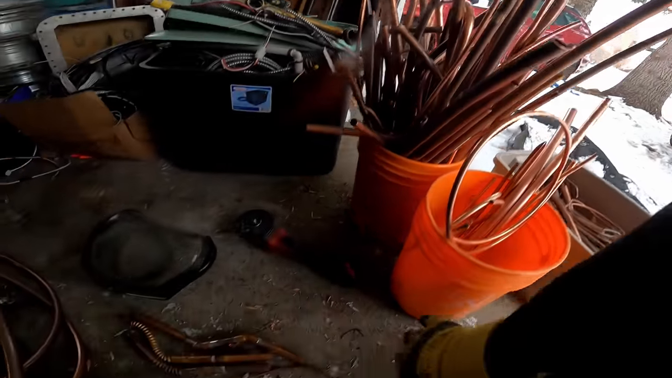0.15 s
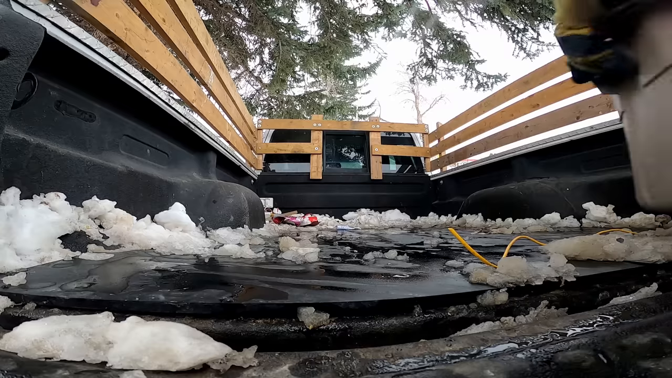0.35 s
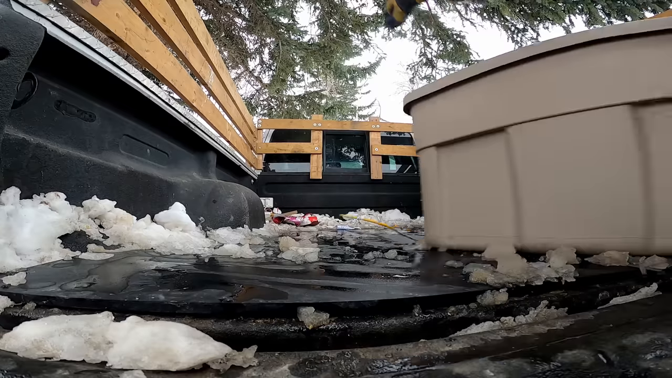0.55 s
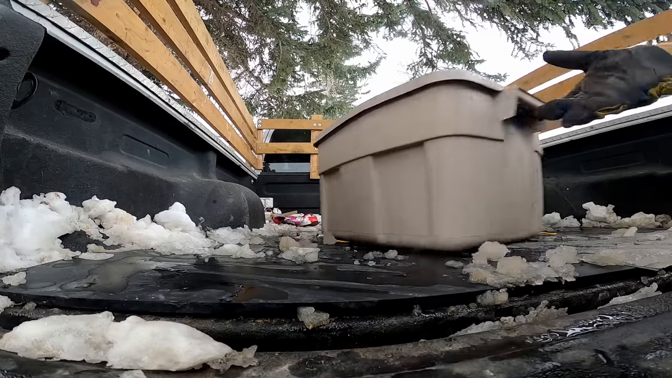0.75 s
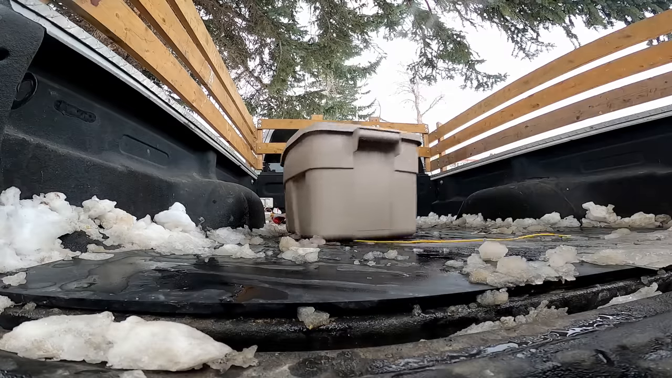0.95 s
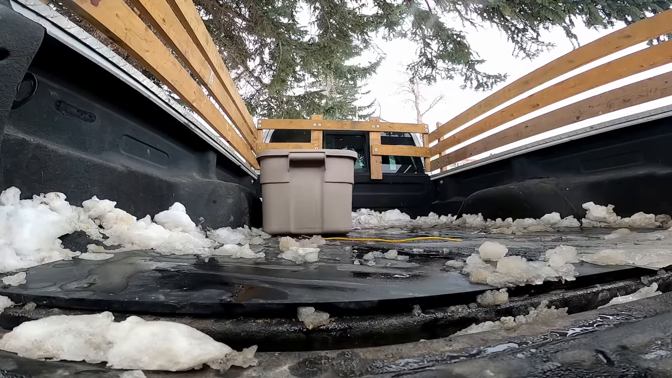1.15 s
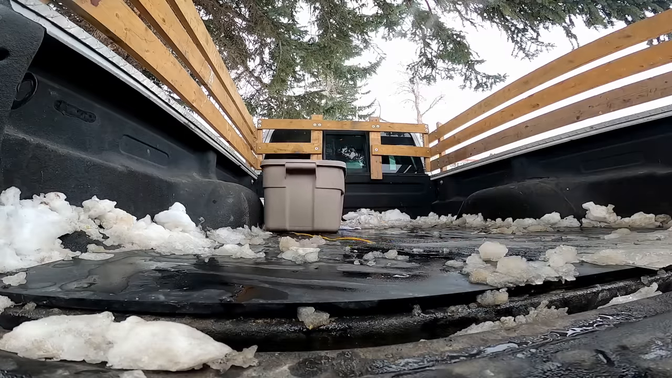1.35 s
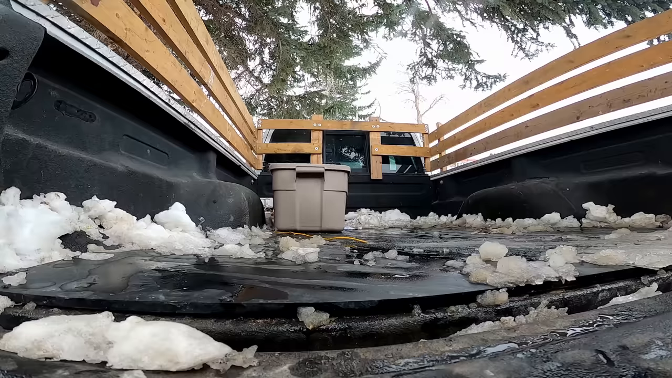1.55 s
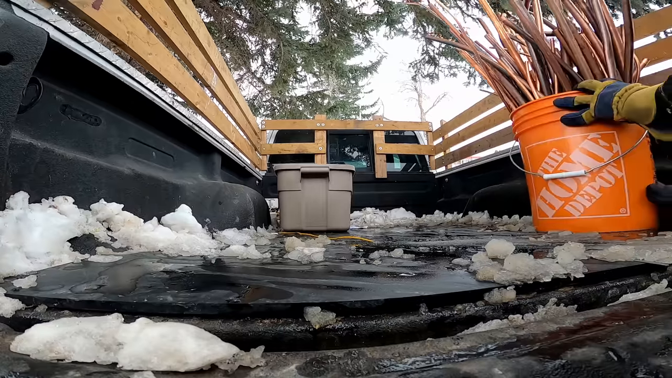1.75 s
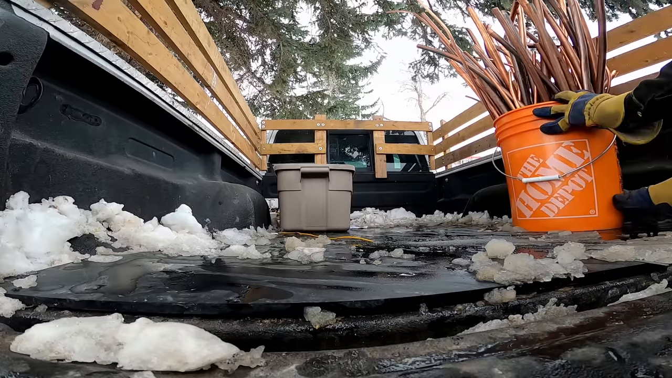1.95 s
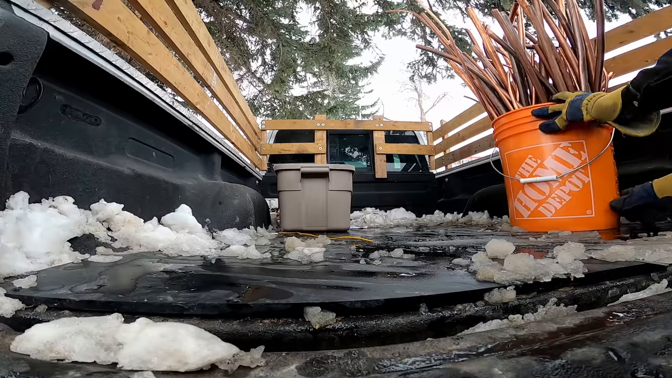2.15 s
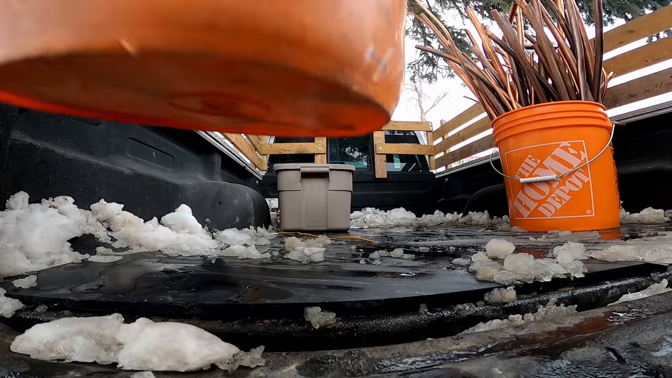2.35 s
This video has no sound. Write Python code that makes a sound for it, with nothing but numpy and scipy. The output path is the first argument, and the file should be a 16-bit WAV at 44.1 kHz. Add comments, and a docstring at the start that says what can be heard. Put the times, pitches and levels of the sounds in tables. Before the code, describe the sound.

A loaded plastic tote is shoved along an icy truck bed close to the microphone, crunching, knocking and rattling, then a bucket of copper tubing lands with a clatter, shifts slightly, and a few tubes clink outdoors.

```python
"""Close to the microphone, a loaded plastic tote is shoved along an icy truck bed: it crunches, drums and stops.
Its friction is random grain impulses ringing the tote and its scrap; knocks, snaps and thuds are struck on top.
Then a bucket of copper tubing lands with a clatter of ringing modes and is nudged into place.
As that ends, loose tubes clink on and the microphone takes a soft bump, one pressure pulse.
Throughout, filtered noise makes the rumble of the bed on its springs and the quiet outdoor air."""
import sys
import numpy as np
from scipy import signal
from scipy.fft import rfft, irfft
from scipy.io import wavfile
from scipy.ndimage import uniform_filter1d

SR = 44100
rng = np.random.default_rng(int(sys.argv[2]) if len(sys.argv) > 2 else 0)


def file_out(sig):
    """Save sig as 16-bit WAV at sys.argv[1]."""
    # one column per channel
    cols = np.atleast_2d(sig).T
    # limit, then scale
    lim = np.clip(cols, -1, 1)
    pcm = np.round(lim * 32767).astype(np.int16)
    wavfile.write(sys.argv[1], SR, pcm)


N = 110250

# Friction of tote and bucket on the bed: start_s, drumming_db, scrape_db, crunch_db, fizz_db
TOTE_FRICTION = [(0.031, -68, -72, -73, -82), (.15, -61.5, -59, -62.5, -72.5), (.295, -61, -78, -64.5, -63),
                 (.315, -45.5, -54, -59, -81), (.37, -44, -49.5, -57, -71), (.425, -51, -56, -58, -68),
                 (.478, -39.5, -55, -61, -75), (.495, -49, -48, -43, -62), (.518, -41, -37, -45, -49),
                 (0.537, -31.5, -26.5, -28.5, -41), (.556, -24.5, -32.5, -30, -39.5),
                 (.635, -26.5, -36, -26, -40), (.685, -30, -30.5, -25.5, -38.5), (.73, -36, -38, -30, -47),
                 (.775, -30, -28, -31, -40.5), (.85, -30.5, -31, -34.5, -41),
                 (.925, -31.5, -31.5, -26.5, -34.5), (.955, -31.5, -35.5, -30, -38.5),
                 (1.019, -36.5, -27.5, -32.5, -36), (1.05, -41.5, -31.5, -34.5, -43),
                 (1.14, -34.5, -34, -33, -47), (1.235, -39.5, -33.5, -30.5, -44),
                 (1.275, -26, -28, -35.5, -46), (1.37, -29.5, -36, -34.5, -45.5),
                 (1.45, -33, -39, -42, -50.5), (1.62, -40, -44.5, -48.5, -63.5)]
BUCKET_FRICTION = [(1.632, -41, -46, -31.5, -54), (1.67, -43, -44, -40, -47), (1.737, -42, -50.5, -45, -69),
                   (1.755, -44.5, -44, -52.5, -56), (1.84, -43.5, -44, -42, -61),
                   (1.88, -47, -44, -49.5, -62), (1.94, -47, -46.5, -48, -59),
                   (2.005, -44.5, -44.5, -49.5, -64), (2.1, -52, -57, -61.5, -77),
                   (2.175, -55, -88, -67, -69)]
# Edges of those four friction bands: edge_hz
FRICTION_EDGES_HZ = [170, 700, 2500, 8500, 17000]
# Colour of the friction: frequency_hz, relative_level_db
TOTE_COLOUR = [(100, 15.5), (190, 8), (290, 4), (450, 2.5), (900, -5), (1250, -4.5), (2700, -13.5),
               (4000, -15.5), (8200, -19), (9800, -23), (13000, -20), (16000, -30)]
BUCKET_COLOUR = [(100, -25), (200, -15), (330, 3.5), (550, 3), (900, -0.5), (1300, -2), (2700, -14),
                 (8000, -20.5), (11000, -17.5), (16000, -21)]
GRAINS_PER_S, GRAIN_SPREAD_DB, GRAIN_CAP = 6000, 2, 2.9  # the cap is in multiples of the spread
JUDDER_DB, JUDDER_S = 0.73, 0.0069
ECHO_CHANGE_S, BED_T60_S = 0.06, 0.028
# Shares of bed echo and ringing bodies, against the bare grains
BED_SHARE, TOTE_SHARE, SCRAP_SHARE, TUBES_SHARE = 0.47, 0.11, 0.089, 0.058

# Ring of the tote on the bed: pitch_hz, relative_level_db, t60_s
TOTE_MODES = [(200, 0.5, 0.15), (233.2, 1.5, 0.12), (289, -2, 0.14), (336.4, -1, 0.046), (393.7, -3, 0.16),
              (450, -6, 0.17), (612, -7.5, 0.13), (781, 1, 0.066), (945.5, -3.5, 0.17), (1082, -4.5, 0.072)]
# Higher ring of the tote and its load of scrap: pitch_hz, relative_level_db, t60_s
SCRAP_MODES = [(1534, 4, .1), (2309, 6, 0.11), (2684, -9, 0.09), (2890, -13, .08), (3730, 8, 0.084),
               (5460, 2, .08)]
# Ring of the bundle of tubing: pitch_hz, relative_level_db, t60_s
TUBE_MODES = [(824, 7, 0.091), (1247, -8, 0.25), (1775, 0, 0.1), (3200, -4.5, 0.19), (3650, -13, 0.11),
              (5470, -4, 0.14), (6132, -4.5, 0.091), (7430, -9, 0.081), (9700, -10, 0.082)]

# Boom of the bed under the tote: frequency_hz, relative_level_db
BOOM_COLOUR = [(20, -12), (60, 1), (130, -8), (400, -53)]
BOOM_DB, BOOM_FADE_DB_PER_S = 2.5, 12.5  # level against the drumming, and its steady fade

# Knocks of tote or bucket on the bed: start_s, level_db, centre_hz
KNOCK_EVENTS = [(.306, -39.5, 261), (0.333, -37, 450), (0.369, -41.5, 500), (0.448, -33.5, 198),
                (0.529, -22.5, 600), (.563, -15.5, 500), (0.598, -17.5, 300), (.684, -30.5, 450),
                (0.7523, -22, 650), (.8, -26.5, 323), (.821, -24.5, 598), (0.972, -28.5, 450),
                (1.165, -25, 560), (1.266, -17.5, 620), (1.302, -23, 790), (1.329, -16.5, 360),
                (1.365, -20, 403), (1.576, -29, 750), (1.682, -34, 700), (1.751, -32, 945),
                (1.836, -40, 900)]
# Colour of a knock before its centre is favoured: frequency_hz, relative_level_db
KNOCK_SPECTRUM = [(80, -26), (190, 4.5), (500, 12), (950, 11), (1500, 4.5), (4000, -16), (16000, -34)]
KNOCK_T60_S, KNOCK_RISE_S = 0.044, 0.0019
KNOCK_RING_SHARE, KNOCK_SLOPE_DB_PER_OCTAVE = 0.76, 6

# Sharp snaps of ice and scrap, and one last faint tick of tubing: start_s, level_db, centre_hz
CRACK_EVENTS = [(.308, -47, 1040), (.364, -44.5, 6000), (0.42, -41.5, 1440), (.492, -32, 7700),
                (.502, -25.5, 970), (.523, -22, 1890), (.53, -23.5, 3340), (0.542, -26, 6850),
                (.714, -18.5, 2860), (0.72, -19, 2920), (0.74, -28, 5650), (0.753, -20, 3670),
                (0.773, -21.5, 2720), (.805, -20.5, 1860), (0.822, -24, 2280), (0.861, -24, 1750),
                (.921, -22, 7370), (1, -25, 1800), (1.022, -27, 4000), (1.122, -29.5, 6400),
                (1.165, -24, 2070), (1.268, -20.5, 1530), (1.329, -25.5, 5030), (2.432, -47.5, 1020)]
CRACK_T60_S, CRACK_SLOPE_DB_PER_OCTAVE = 0.046, 11
CRACK_TONE_SHARE, CRACK_TONE_T60_S = 0.85, 0.026

# Loose scrap in the moving tote, level against the scrape
RATTLES_PER_S, RATTLE_DB, RATTLE_SPREAD_DB = 60, 1.5, 3
RATTLE_LOW_HZ, RATTLE_HIGH_HZ = 805, 6500

# Copper tubes strike each other: start_s, low_db, middle_db, high_db, struck_tube_hz
CLINK_EVENTS = [(.01, -72, -38.5, -45.5, 2070), (1.6255, -31, -27, -28.5, 1255),
                (1.635, -33, -36, -31.5, 3030), (1.682, -37, -46, -37, 8100), (1.708, -49, -45, -40, 8380),
                (1.756, -53, -40, -42.5, 6130), (1.797, -55, -38.5, -39.5, 6750),
                (1.82, -35.5, -41.5, -45, 3170), (1.926, -39, -48, -46, 4840),
                (1.991, -48, -44.5, -46, 1780), (2.18, -56, -48, -46, 2770),
                (2.191, -42.5, -49.5, -46.5, 885), (2.257, -55, -47, -52, 2710),
                (2.267, -39, -37, -42.5, 1490), (2.338, -48, -44.5, -50.5, 1384),
                (2.486, -34.5, -34, -44.5, 2620)]
# Edges of the low, middle and high clink bands: edge_hz
CLINK_BAND_EDGES_HZ = [250, 1200, 4000, 17000]
# Colour of the dense chatter: frequency_hz, relative_level_db
CHATTER_COLOUR = [(200, 9.5), (800, -8), (1400, 1), (2600, -2.5), (3800, -6.5), (5800, 0.5), (8000, 0.5),
                  (10000, -10), (13000, -14), (16000, -16)]
# Decay of the chatter in the low, middle and high bands: t60_s
CHATTER_T60_S = [0.2, 0.065, 0.11]
CLINK_RISE_S, CLINK_HOLD_S = 0.002, 0.0011
STRUCK_DB, STRUCK_T60_S = -4, 0.083  # the struck tube, against the level of its band
BUNDLE_SPREAD_DB, TUBE_RING_SHARE = 3, 0.6
TUBE_DETUNE, TUBE_SPREAD_DB = 0.14, 4  # detune is a fraction of the pitch
LANDING_S, LANDING_DB = 1.627, -27.5  # the bucket lands and the whole bundle rings

# Dull thuds as weight shifts on the bed: start_s, level_db, pitch_hz
THUD_EVENTS = [(0.209, -23, 60), (0.33, -22.5, 75.4), (0.384, -28, 80), (0.423, -27, 63),
               (0.55, -18.5, 69.4), (.592, -22, 66), (1.625, -20.5, 47.3), (1.694, -16.5, 36),
               (2.014, -23.5, 28), (2.05, -25, 70)]
THUD_T60_CYCLES, THUD_RISE_S = 5.4, 0.0025

# Soft bump at the microphone; level before the high-pass
BUMP_S, BUMP_DB, BUMP_RISE_S, BUMP_FALL_S, BUMP_CUT_HZ = 2.224, -9, 0.00307, 0.00235, 7.5

# Low rumble of the bed: start_s, level_db
RUMBLE_CURVE = [(0, -40), (.3, -35.5), (.6, -37), (1, -41), (1.55, -39.5), (1.72, -24), (1.82, -31),
                (2.05, -31), (2.25, -36), (2.42, -39.5), (2.5, -33)]
# Colour of the rumble: frequency_hz, relative_level_db
RUMBLE_COLOUR = [(8, 0), (18, 16.5), (28, -14), (50, -7), (80, -6), (120, -31), (250, -42), (1000, -66)]
# Quiet outdoor air: start_s, level_db
AIR_CURVE = [(0, -45), (.15, -50), (2.15, -49.5), (2.5, -49)]
# Colour of the air: frequency_hz, relative_level_db
AIR_COLOUR = [(30, 10), (120, -4.5), (250, -4), (800, -7.5), (1500, -14), (3000, -24.5), (6000, -24.5),
              (10000, -33.5), (16000, -39)]

# Colour of the faint smear of the mix that differs between channels: frequency_hz, gain_db
SMEAR_COLOUR = [(30, -39), (80, -9.5), (2500, -39), (5500, -9.5), (9000, -1.5)]
SMEAR_DB = -22  # on top of the smear's colour
CUT_HZ = 15900  # upper limit of tube partials and of the microphone signal


def slide(curve, grit, rings):
    """Plastic judders over ice grains, which ring container and load; bed echoes change as it moves."""
    size = amp(GRAIN_SPREAD_DB * np.minimum(rng.exponential(1, N), GRAIN_CAP))
    size *= rng.choice([-1, 1], N)
    judder = unit(uniform_filter1d(rng.standard_normal(N), max(int(JUDDER_S * SR), 2)))
    struck = rng.random(N) < GRAINS_PER_S / SR
    grains = size * struck * amp(JUDDER_DB * judder)
    t = seconds(size=8192)
    banks = []
    for share, table in rings:
        bank = [amp(db - 60 * t / t60) * np.exp(2j * np.pi * hz * t) for hz, db, t60 in table]
        banks.append((share, np.array(bank)))
    fade = amp(-60 * t / BED_T60_S)
    rubbed = grains.copy()
    step = round(ECHO_CHANGE_S * SR)
    for start in range(0, N, step):
        # each stretch of the slide has new bed echoes and new mode phases
        response = BED_SHARE * unit(rng.standard_normal(len(t)) * fade)
        for share, bank in banks:
            phases = np.exp(2j * np.pi * rng.random((len(bank), 1)))
            response += share * unit((bank * phases).sum(0).imag)
        echoed = signal.fftconvolve(grains[start:start + step], response / np.sqrt(len(t)))
        add(rubbed, start / SR, echoed)
    rubbed = colour(rubbed, grit)
    t = seconds(N)
    moving = uniform_filter1d(1. * ((t > curve[0][0]) & (t < curve[-1][0])), size=200)
    friction = np.zeros(N)
    for column, (lo, hi) in enumerate(zip(FRICTION_EDGES_HZ, FRICTION_EDGES_HZ[1:]), 1):
        friction += unit(band(rubbed, lo, hi)) * level(curve, column)
    return moving * friction


def boom():
    """The bed resounds below the drumming of the tote and fades as it moves away."""
    t = seconds(N)
    moving = uniform_filter1d(1. * (t < TOTE_FRICTION[-1][0]), size=2000)
    gain = amp(BOOM_DB - BOOM_FADE_DB_PER_S * t) * moving * level(TOTE_FRICTION)
    return gain * unit(colour(rng.standard_normal(N), BOOM_COLOUR))


def knock(db, hz):
    """A dull blow on hollow plastic; the place of contact decides which modes speak."""
    t = seconds(size=16384)
    noise = colour(rng.standard_normal(len(t)), KNOCK_SPECTRUM)
    blow = unit(around(noise, hz, KNOCK_SLOPE_DB_PER_OCTAVE)) * amp(-60 * t / KNOCK_T60_S)
    modes = []
    for mode_hz, mode_db, t60 in TOTE_MODES:
        octaves = abs(np.log2(mode_hz / hz))
        modes.append((mode_hz, mode_db - KNOCK_SLOPE_DB_PER_OCTAVE * octaves, t60))
    rise = np.minimum(t / KNOCK_RISE_S, 1)
    return amp(db) * rise * (blow + KNOCK_RING_SHARE * ring(modes))


def crack(db, hz):
    """A short snap of ice or scrap, or a tick of tubing: noise around one pitch, with a brief ring."""
    t = seconds(size=4096)
    noise = around(rng.standard_normal(len(t)), hz, CRACK_SLOPE_DB_PER_OCTAVE)
    snap = unit(noise) * amp(-60 * t / CRACK_T60_S)
    tone = np.sqrt(2) * np.sin(2 * np.pi * hz * t) * amp(-60 * t / CRACK_TONE_T60_S)
    return amp(db) * (snap + CRACK_TONE_SHARE * tone) / np.hypot(1, CRACK_TONE_SHARE)


def rattle():
    """Small pieces of scrap tick against each other while the tote moves, each at its own pitch."""
    out = np.zeros(N)
    scrape = level(TOTE_FRICTION, column=2)
    start, stop = TOTE_FRICTION[0][0], TOTE_FRICTION[-1][0]
    count = int(RATTLES_PER_S * (stop - start))
    for when, pitch, force in rng.random((count, 3)):
        s = start + when * (stop - start)
        hz = RATTLE_LOW_HZ * (RATTLE_HIGH_HZ / RATTLE_LOW_HZ) ** pitch
        db = RATTLE_DB + RATTLE_SPREAD_DB * (2 * force - 1)
        add(out, s, scrape[int(s * SR)] * crack(db, hz))
    return out


def clink(levels_db, hz):
    """Bundled tubes chatter briefly; the struck tube and a few neighbours stand out of the damped ring."""
    t = seconds(size=16384)
    chatter = colour(bundle(t), CHATTER_COLOUR)
    tubes = other_tubes()
    out = np.zeros(len(t))
    edges = CLINK_BAND_EDGES_HZ
    for db, t60, lo, hi in zip(levels_db, CHATTER_T60_S, edges, edges[1:]):
        dense = unit(band(chatter, lo, hi)) * amp(-60 * np.maximum(t - CLINK_HOLD_S, 0) / t60)
        modes = unit(band(tubes, lo, hi)) * dense.std()
        out += amp(db) * (dense + TUBE_RING_SHARE * modes) / np.hypot(1, TUBE_RING_SHARE)
        if lo <= hz < hi:
            out += amp(db + STRUCK_DB) * ring([(hz, 0, STRUCK_T60_S)])
    return out * np.minimum(t / CLINK_RISE_S, 1)


def bundle(t, count=240):
    """The many faint partials of a bundle of bent tubes; each blow wakes a different set."""
    hz = np.linspace(CLINK_BAND_EDGES_HZ[0], CUT_HZ, count)
    hz += rng.uniform(-1, 1, count) * CUT_HZ / count / 2
    strength = amp(BUNDLE_SPREAD_DB * rng.standard_normal(count))
    partials = np.zeros(len(t) // 2 + 1, complex)
    partials[(hz * len(t) / SR).astype(int)] = strength * np.exp(2j * np.pi * rng.random(count))
    return irfft(partials)


def other_tubes():
    """Tubes differ in length, so each clink has its own shifted modes, damped by the neighbours."""
    chance = 2 * rng.random((len(TUBE_MODES), 2)) - 1
    modes = []
    for (hz, db, t60), (shift, strength) in zip(TUBE_MODES, chance):
        modes.append((hz * (1 + TUBE_DETUNE * shift), db + TUBE_SPREAD_DB * strength, t60 / 2))
    return ring(modes)


def landing():
    """The bucket lands on the bed and every mode of the bundle rings."""
    return amp(LANDING_DB) * ring(TUBE_MODES)


def thud(db, hz):
    """The bed dips and swings for a few cycles."""
    t = seconds(size=16384)
    swing = amp(db - 60 * t * hz / THUD_T60_CYCLES) * np.sin(2 * np.pi * hz * t)
    return -np.minimum(t / THUD_RISE_S, 1) * swing


def bump():
    """One soft pressure pulse at the microphone."""
    t = seconds(size=8192)
    push = np.minimum(t / BUMP_RISE_S, 1) * np.exp(-np.maximum(t - BUMP_RISE_S, 0) / BUMP_FALL_S)
    high_pass = signal.butter(2, BUMP_CUT_HZ, "high", fs=SR, output="sos")
    return -amp(BUMP_DB) * signal.sosfilt(high_pass, push)


def background():
    """Rumble of the bed and quiet outdoor air, both as coloured noise."""
    rumble, air = rng.standard_normal((2, N))
    rumble = unit(colour(rumble, RUMBLE_COLOUR)) * level(RUMBLE_CURVE)
    air = unit(colour(air, AIR_COLOUR)) * level(AIR_CURVE)
    return rumble + air


def amp(db):
    """Decibels to gain."""
    return 10 ** (np.asarray(db) / 20)


def unit(x):
    """Scales to rms 1."""
    return x / np.sqrt(np.mean(x ** 2) + 1e-20)


def add(mix, s, sound):
    """Mixes a sound in at a time in seconds."""
    part = mix[max(round(s * SR), 0):][:len(sound)]
    part += sound[:len(part)]


def seconds(size):
    """Time axis."""
    return np.arange(size) / SR


def colour(x, points):
    """Filters by a spectrum of (frequency_hz, level_db) points, joined along log frequency."""
    hz, db = np.transpose(points)
    bins = np.fft.rfftfreq(len(x), 1 / SR) + 1
    return irfft(rfft(x) * amp(np.interp(np.log(bins), np.log(hz), db)), len(x))


def around(x, hz, slope_db):
    """Favours one frequency, falling off on both sides by slope_db per octave."""
    octaves = abs(np.log2((np.fft.rfftfreq(len(x), 1 / SR) + 1) / hz))
    return irfft(rfft(x) * amp(-slope_db * octaves))


def band(x, lo, hi):
    """Band-pass."""
    return signal.sosfilt(signal.butter(4, [lo, hi], "band", fs=SR, output="sos"), x)


def level(points, column=1):
    """Gain curve from one decibel column of rows that begin with start_s."""
    rows = np.array(points)
    return amp(np.interp(seconds(N), rows[:, 0], rows[:, column]))


def ring(modes):
    """Dying sine modes at random phases, starting at about rms 1."""
    t = seconds(size=16384)
    out = np.zeros(len(t))
    for hz, db, t60 in modes:
        out += amp(db - 60 * t / t60) * np.sin(2 * np.pi * (hz * t + rng.random()))
    return out / np.sqrt(sum(amp(db) ** 2 for _, db, _ in modes) / 2)


def through(x, response):
    """Convolves with a response scaled to energy 1."""
    return signal.fftconvolve(x, response / np.linalg.norm(response))[:N]


def scene():
    """All sources at the microphone; a faint filtered-noise smear of the mix differs between channels."""
    mix = slide(TOTE_FRICTION, TOTE_COLOUR, [(TOTE_SHARE, TOTE_MODES), (SCRAP_SHARE, SCRAP_MODES)])
    mix += boom() + rattle()
    mix += slide(BUCKET_FRICTION, BUCKET_COLOUR, [(TUBES_SHARE, TUBE_MODES)])
    mix += background()
    add(mix, LANDING_S, landing())
    for s, db, hz in KNOCK_EVENTS:
        add(mix, s, knock(db, hz))
    for s, db, hz in CRACK_EVENTS:
        add(mix, s, crack(db, hz))
    for s, *levels_db, hz in CLINK_EVENTS:
        add(mix, s, clink(levels_db, hz))
    for s, db, hz in THUD_EVENTS:
        add(mix, s, thud(db, hz))
    add(mix, BUMP_S, bump())
    # the mix through a short noise response, added to one channel and taken from the other
    smear = amp(SMEAR_DB) * colour(through(mix, rng.standard_normal(size=700)), SMEAR_COLOUR)
    return np.array([mix + smear, mix - smear])


def record(dry):
    """A soft limiter on the peaks, then the band limit."""
    ceiling, knee = 0.33, 5
    limited = dry / (1 + abs(dry / ceiling) ** knee) ** (1 / knee)
    low_pass = signal.firwin(511, CUT_HZ, window=("kaiser", 9), fs=SR)
    return signal.oaconvolve(limited, low_pass[None], "same")


dry = scene()
out = record(dry)
file_out(out)
```